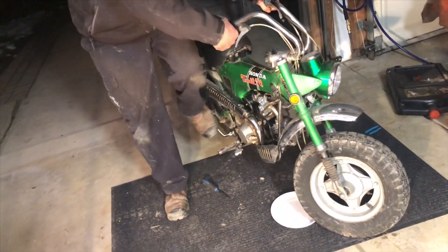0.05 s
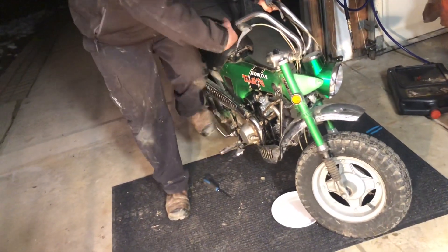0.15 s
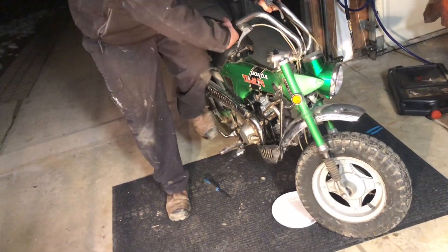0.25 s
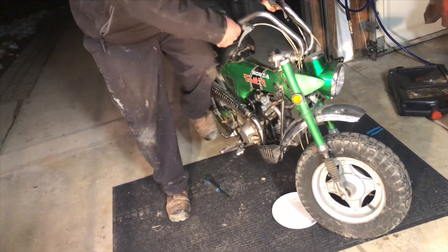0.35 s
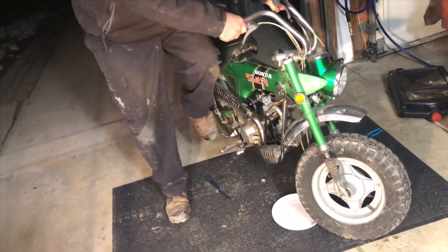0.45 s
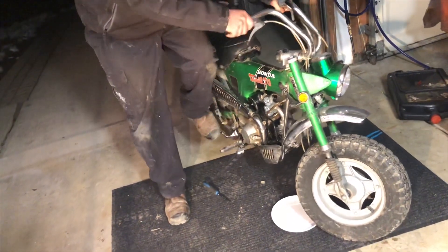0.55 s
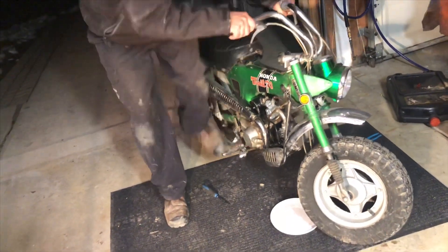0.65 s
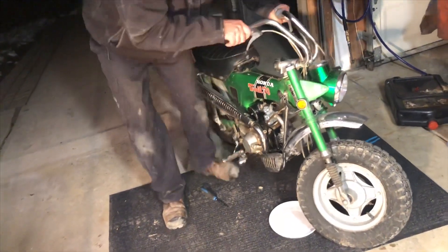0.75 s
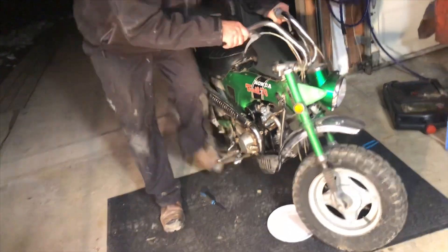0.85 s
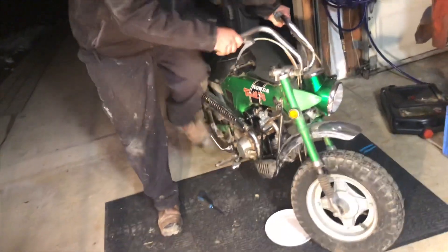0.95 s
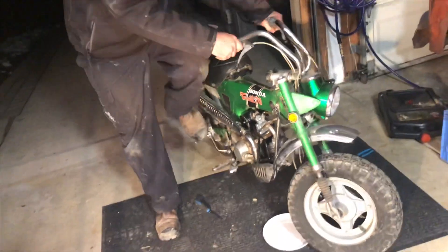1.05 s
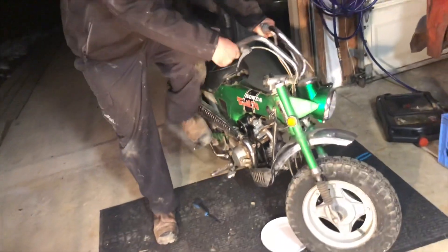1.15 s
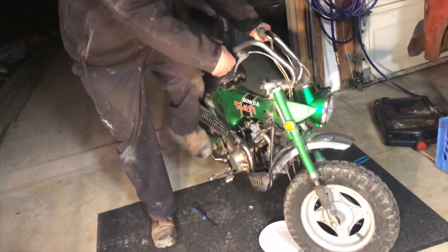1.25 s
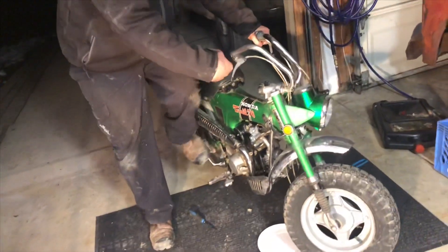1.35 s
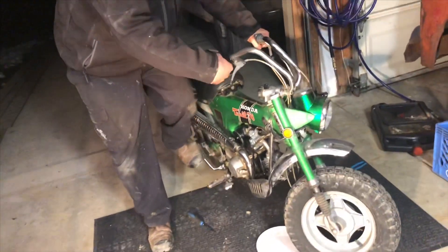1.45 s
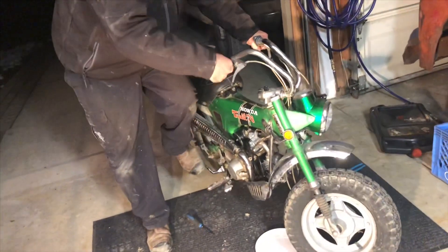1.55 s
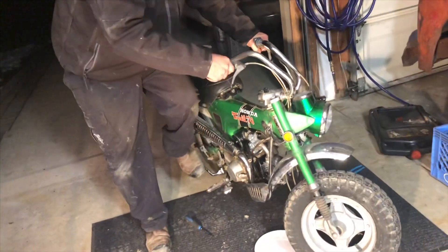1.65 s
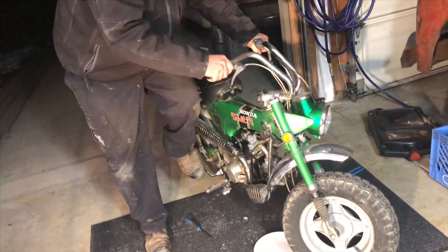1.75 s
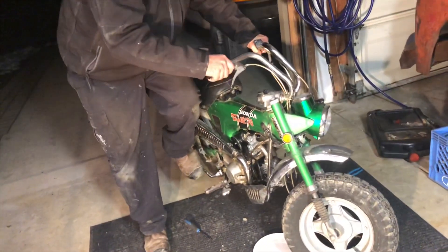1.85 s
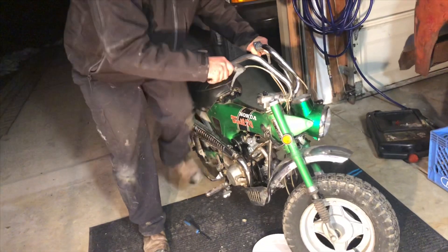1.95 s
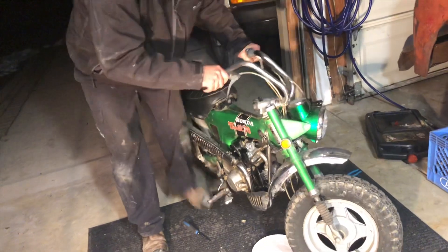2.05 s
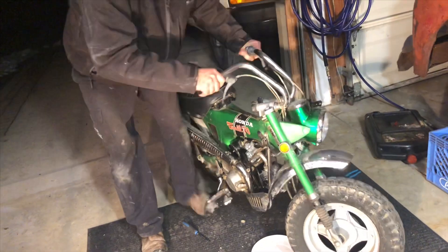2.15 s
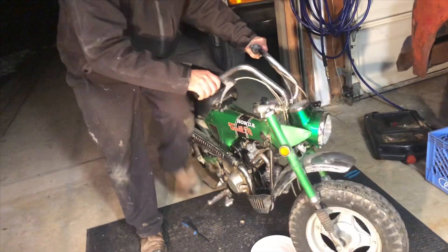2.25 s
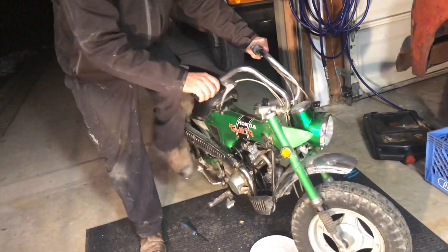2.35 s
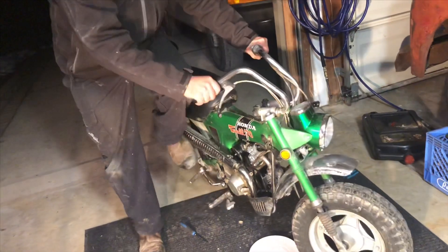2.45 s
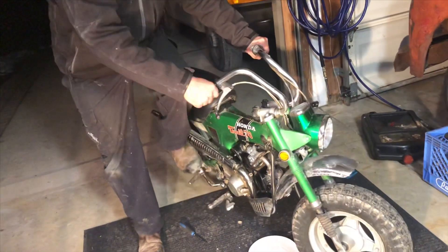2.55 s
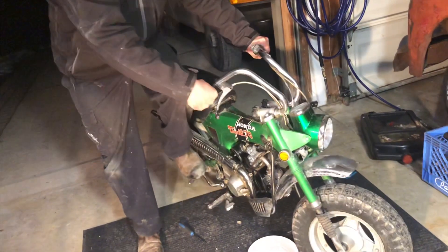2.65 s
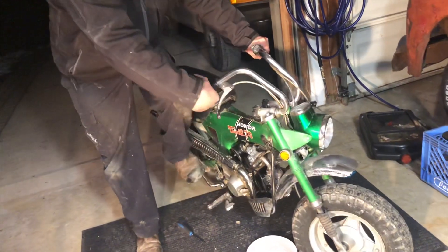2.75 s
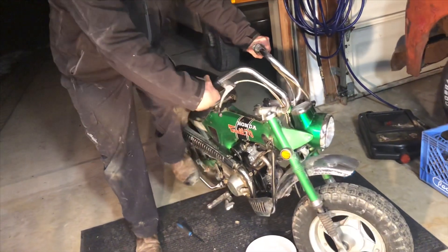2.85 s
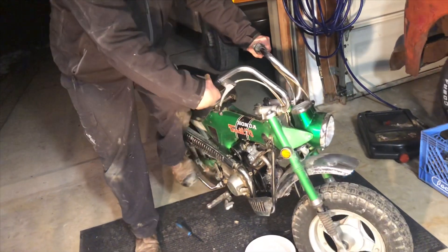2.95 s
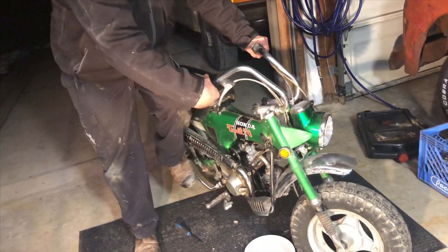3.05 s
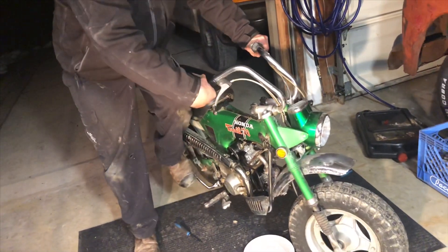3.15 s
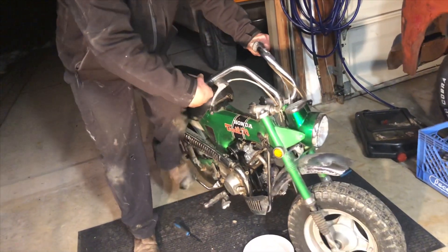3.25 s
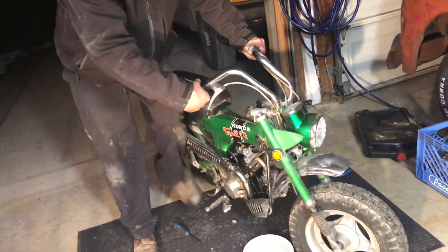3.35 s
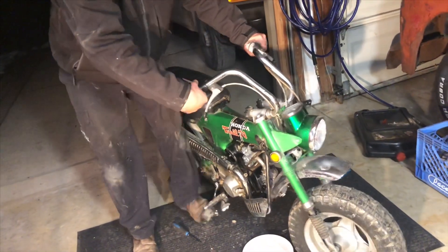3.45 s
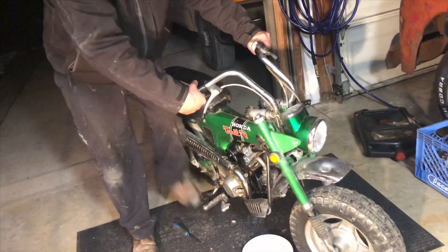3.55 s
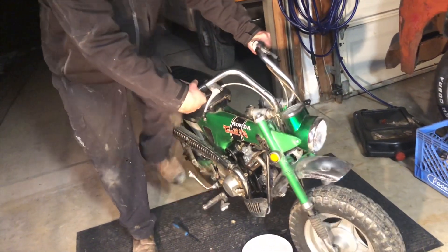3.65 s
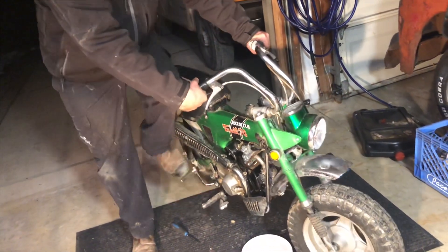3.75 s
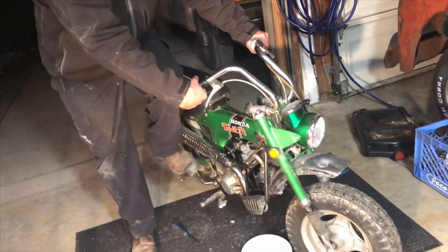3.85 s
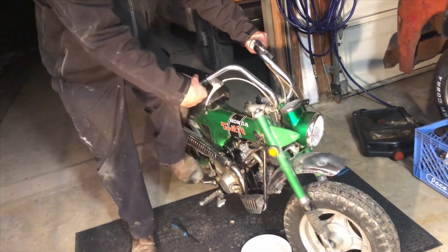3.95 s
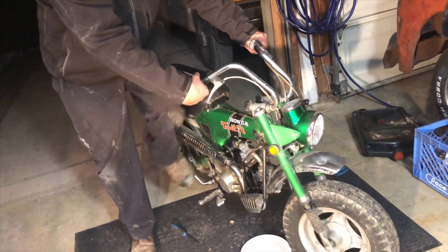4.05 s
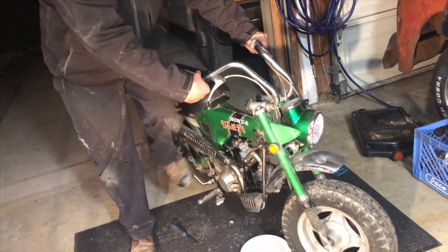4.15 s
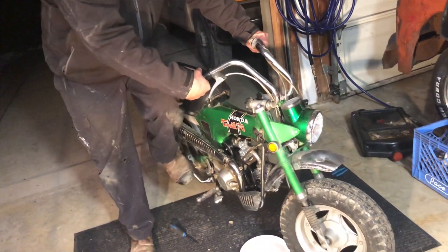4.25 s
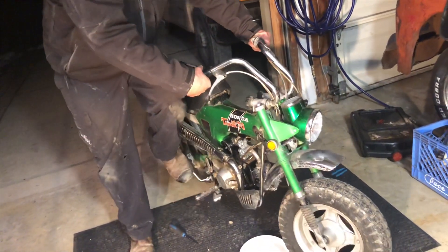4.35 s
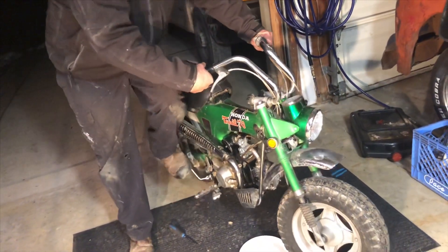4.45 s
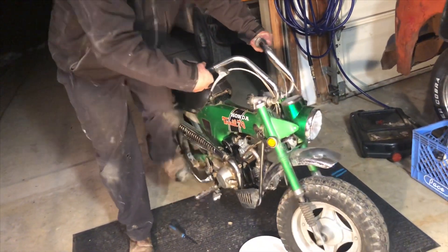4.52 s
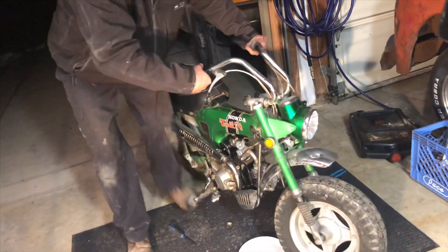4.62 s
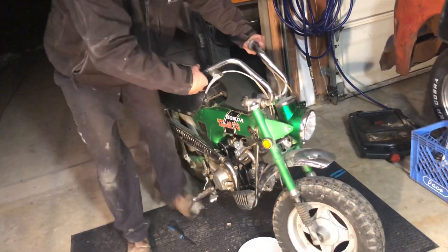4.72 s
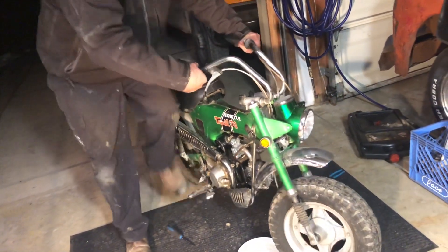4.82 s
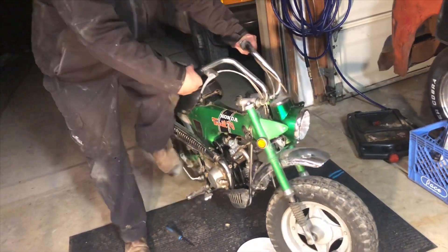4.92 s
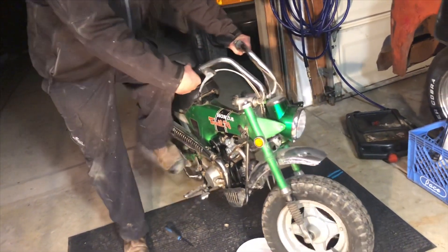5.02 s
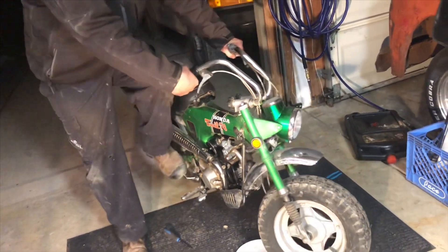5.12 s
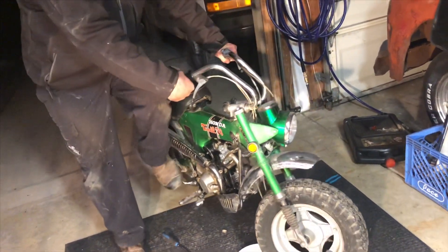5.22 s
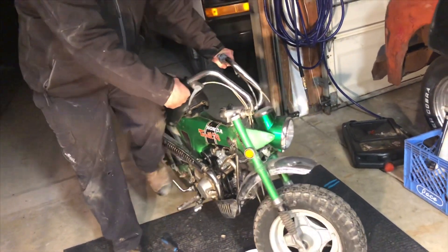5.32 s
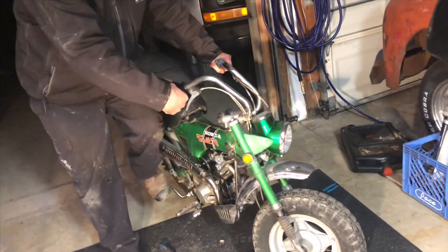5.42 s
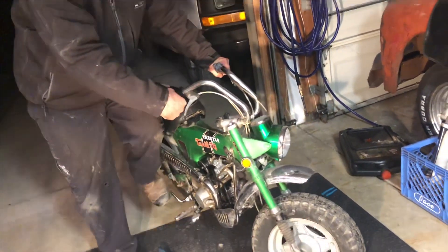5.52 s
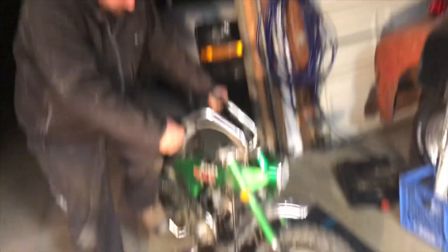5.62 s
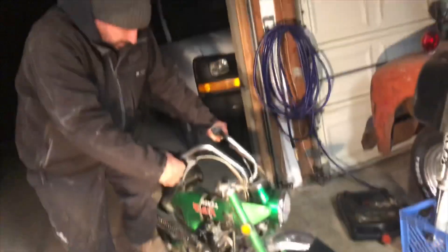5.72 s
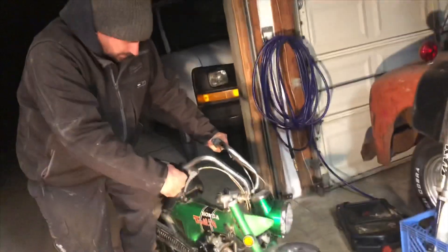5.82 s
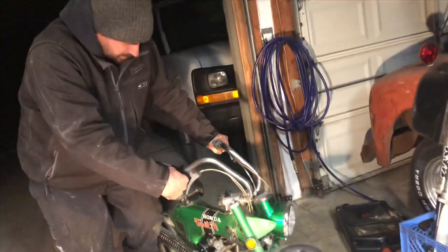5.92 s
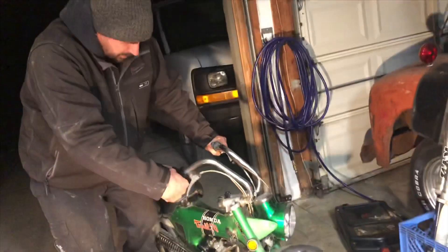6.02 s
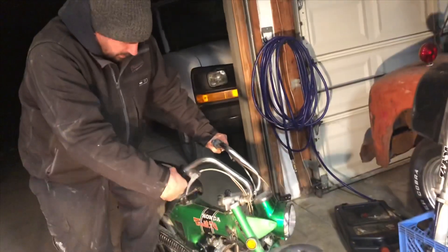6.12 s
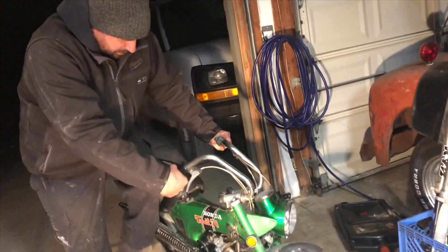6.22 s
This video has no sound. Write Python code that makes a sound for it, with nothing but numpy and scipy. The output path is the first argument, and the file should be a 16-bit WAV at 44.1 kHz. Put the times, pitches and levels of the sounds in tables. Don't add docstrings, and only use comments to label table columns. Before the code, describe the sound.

In a hard-walled garage, a small motorcycle is kicked over four times about every 1.3 seconds. Each kick is a quick burst of metallic clanks, whirring gears, valve clacks and low airy chuffs, then stops with a ringing frame. Between kicks the lever ratchets softly and boots scuff. The engine never fires. Small microphone a couple of steps away, with dense short echo.

```python
import sys
import numpy as np
from scipy import signal
from scipy.fft import rfft, irfft
from scipy.io import wavfile

SR = 44100
rng = np.random.default_rng(int(sys.argv[2]) if len(sys.argv) > 2 else 0)


def output_pcm(signal):
    pcm = np.clip(np.atleast_2d(signal).T, -1, 1) * 32767
    wavfile.write(sys.argv[1], SR, np.round(pcm).astype(np.int16))


def gain_from_db(level_db):
    decades = np.asarray(level_db, float) / 20
    return 10 ** decades


N = 276948

# pitch_hz, density_db
ROOM_SPECTRUM = [(12, -53), (20, -2), (53, -3), (141, -1.5), (961, -9), (1200, -19), (1310, -6.5),
                 (1500, -7.5), (1630, -13.5), (8920, -32), (15600, -40.5)]
ROOM_DB = -61
# pitch_hz, level_db
MAINS_HUM = [(59, -73), (120, -74.5)]
# pitch_hz, t60_s
ECHO_T60 = [(60, 0.46), (250, 0.56), (1200, 0.43), (4000, 0.41), (12000, 0.25)]

# pitch_hz, density_db
WHIRR_SPECTRUM = [(150, -30), (250, 8), (576, -1), (707, -2.5), (1480, 0.5), (1690, -3), (3090, -14),
                  (3750, -21.5), (4500, -39), (5850, -72), (9900, -120)]
# pitch_hz, density_db
BREATH_SPECTRUM = [(18, -66), (30, -32), (88, -2), (150, -8.5), (200, 2), (230, -7), (409, -7.5),
                   (500, -23), (650, -31), (1100, -120)]
# pitch_hz, density_db
RATTLE_SPECTRUM = [(1470, -6), (2500, -69), (3070, 9.5), (3780, 8.5), (4790, -0.5), (7190, -8.5),
                   (8130, -6), (11000, -14), (15600, -27)]
CASE_HZ = [700, 1050, 1200, 1600, 1860, 2150, 2550, 2900, 3670, 4500, 5500, 6400]
# width_hz, level_db
CASE_MODES = [(90, 7), (80, 7), (90, 5), (120, 2), (90, 6), (100, 3), (110, 4), (150, 3), (380, -1.5),
              (400, 2), (350, 4), (250, 4)]

TUBE_HZ = [388, 592, 1044, 1141, 1190, 1211, 1437]
# level_db, t60_s
TUBE_MODES = [(-4, .7), (-8, .8), (-3, 1.7), (5, 1.3), (5, 1.8), (2, 2.0), (-8, 1.0)]
# time_s, level_db
GRIP = [(0, 8), (.7, -19), (1.1, -5), (1.3, 11), (2.1, 6.5), (2.6, -9), (3.298, 20), (3.5, -4), (3.85, -16),
        (4.6, 7), (4.901, 0), (5.2, -1), (6.28, 6)]
# start_s, level_db, pitch_hz, t60_s
SINGING_TUBES = [
    (.97, -54, 1044, 2.6),
    (2.5, -54, 1211, 2.6),
    (1.15, -56, 1200, 2.8),
    (3.6, -52, 1044, 3.2),
    (3.85, -54, 1190, 1.2),
]
SING_RISE_S = 0.024

SQUEAK_HZ = [1150, 12200, 1100, 10400, 7080, 5260, 1080, 6450, 1050, 1060, 2800, 1075, 7100, 1150, 5500,
             2500, 1140, 975, 1095]
# start_s, length_s, level_db
SQUEAKS = [(.01, 0.07, -52), (0.302, 0.12, -82), (0.794, 0.053, -30), (0.75, .032, -59), (1.004, 0.03, -40),
           (1.229, 0.02, -52), (2.1, 0.17, -39), (2.2, 0.016, -42), (3.385, 0.08, -35),
           (3.489, 0.071, -32.5), (4.637, 0.035, -41), (4.915, 0.06, -34.5), (5.912, 0.027, -84),
           (6.11, 0.12, -55.5), (3.385, 0.039, -56), (5.916, .03, -57), (4.728, 0.06, -34.5),
           (4.645, .04, -45), (5.1, 0.16, -52)]

# peak_s, level_db, pitch_hz
BOOTS = [(0.016, -44.5, 151), (0.0867, -42.5, 157), (0.1997, -35.5, 210), (0.2533, -41.5, 160),
         (1.4203, -42.5, 177), (1.535, -40, 181), (1.579, -46.5, 150), (2.8157, -39.5, 157),
         (2.965, -44.5, 178), (3.0286, -47.5, 127), (4.1555, -36, 173), (5.297, -46, 157),
         (5.443, -41.5, 153), (5.4843, -48, 117), (5.6608, -41.5, 162), (5.689, -49, 150),
         (5.7762, -41, 162), (5.995, -32, 157), (6.0383, -41, 131), (6.2582, -50, 163.5)]
BOOT_HALF_S = 0.0047
# peak_s, level_db, pitch_hz
THUMPS = [(0.0966, -44.5, 357), (0.205, -39, 353), (0.7298, -33, 325), (0.7591, -33, 353),
          (0.968, -43, 406), (.253, -47, 403), (.787, -34, 390), (1.08, -45, 345), (1.472, -48.5, 357),
          (4.836, -44, 386), (1.2, -39, 440), (1.426, -49.5, 310), (2.188, -28.5, 480), (2.299, -26.5, 433),
          (2.4444, -46, 442), (2.5258, -36.5, 480), (2.986, -39.5, 393), (3.594, -35, 310),
          (3.646, -37, 386), (3.8684, -33.5, 440), (4.149, -47, 376), (4.726, -33, 381), (4.7477, -37, 390),
          (5.1318, -46, 366), (6.0187, -36.5, 399)]
THUMP_HALF_S, THUMP_HARDENING = 0.0061, 0.44
# peak_s, level_db, pitch_hz, half_length_s
STROKES = [(.7347, -24.5, 173, 0.0065), (.843, -22.5, 159, 0.012), (.9051, -25.5, 152, 0.0039),
           (.941, -27.5, 141.6, 0.0061), (.975, -25, 160, 0.0087), (1.1346, -32, 115, 0.0097),
           (1.1975, -38, 166, 0.023), (2.1707, -20, 153.7, 0.0053), (2.188, -26, 158, .007),
           (2.2382, -28, 147, 0.0019), (2.305, -31, 173, 0.0054), (2.374, -42, 130, 0.0072),
           (2.2739, -24.5, 155, 0.0095), (2.335, -31.5, 127, 0.006), (2.462, -30.5, 120.5, 0.011),
           (2.5117, -29, 195.4, 0.0066), (2.54, -31.5, 101, 0.0041), (3.4655, -24.5, 149, 0.0037),
           (3.4763, -21, 142, 0.0091), (3.5369, -29, 134, 0.0031), (3.5854, -19.5, 139, 0.0058),
           (3.6475, -26.5, 130, 0.0042), (3.728, -30, 125, .006), (3.85, -37, 168, 0.01),
           (3.7452, -25.5, 125, 0.0052), (3.7714, -29.5, 168, 0.0054), (3.8947, -42.5, 192, 0.017),
           (4.6905, -26.5, 148, 0.0022), (4.6975, -21, 140, 0.0049), (4.711, -26.5, 151, 0.0052),
           (4.7235, -26, 150, 0.0043), (4.818, -33, 138, 0.0044), (4.856, -29, 120, 0.0076),
           (4.7875, -18.5, 140, 0.0077), (4.8005, -23, 150, 0.0033), (4.8834, -18.5, 144, 0.0074),
           (4.8955, -20, 148.5, 0.0038), (4.9518, -30, 160, 0.006), (5.0137, -25.5, 119, 0.008),
           (5.05, -29, 162, 0.0039), (4.77, -36, 151, 0.0061), (5.09, -38, 128, 0.012),
           (5.166, -44, 172, 0.0073), (5.1143, -49, 197, 0.0026)]
# peak_s, level_db, pitch_hz, rebound_after_s
HAMMER = [
    (.8505, -13.3, 809, .005),
    (.967, -15.9, 840, .005),
    (2.1833, -13.5, 828, .0051),
    (2.3002, -16.8, 758, .0039),
]
HAMMER_HALF_S, HAMMER_DB = 0.00094, -2.5
REBOUND_PITCH, REBOUND_DB = 0.885, 0.4

# start_s, level_db, pitch_hz, dying_s
RINGS = [(.7168, -34, 2820, .006), (.79, -40, 5500, .01), (.8495, -21.5, 2080, .008),
         (.9288, -34, 2460, .008), (.9657, -21.5, 1820, 0.0077), (1.1493, -27.5, 3280, 0.0044),
         (1.152, -25.5, 2430, 0.0075), (2.0818, -39, 5660, 0.0057), (2.1361, -32.5, 1940, .01),
         (2.181, -26, 1820, 0.013), (2.21, -29.5, 2270, 0.047), (2.2983, -19.5, 1900, 0.006),
         (2.33, -34, 1910, 0.019), (2.5193, -28.5, 1720, .008), (2.951, -41.5, 3800, 0.012),
         (3.374, -34, 1130, 0.02), (3.4576, -31, 1640, 0.011), (3.487, -30.5, 2500, 0.018),
         (3.5668, -30, 2060, 0.0075), (3.5998, -27, 2540, .01), (3.6392, -35.5, 2540, 0.0066),
         (3.716, -33.5, 2070, 0.0068), (3.7754, -38.5, 2480, 0.012), (3.8367, -37, 8560, .005),
         (4.644, -46, 2820, 0.023), (4.6796, -29, 1540, 0.011), (4.7684, -27, 1610, 0.0048),
         (4.77, -33, 2190, .005), (4.8632, -30, 1630, 0.0055), (4.896, -31.5, 2500, 0.012),
         (4.9944, -40, 2100, 0.0037), (5.0418, -47, 2510, 0.01), (5.408, -58, 1780, 0.013),
         (5.98, -36.5, 3300, 0.0061)]
# start_s, level_db
FINS = [(.8495, -44), (.94, -30), (1.116, -40), (2.0818, -40), (2.183, -34), (2.261, -33), (2.442, -41.5),
        (2.4945, -35.5), (3.459, -50), (3.488, -28.5), (3.6, -35), (3.717, -38.5), (3.775, -37),
        (4.709, -30), (4.772, -35), (4.793, -29.5), (4.865, -33), (5.045, -36)]
FIN_HZ, FIN_S = 3750, 0.021
# start_s, level_db
CHAIN = [
    (.876, -43),
    (2.21, -41),
    (3.517, -40.5),
    (3.64, -43.5),
    (4.732, -37),
    (4.818, -37),
    (4.927, -41),
    (5.107, -44.5),
]
CHAIN_HZ, CHAIN_S = 6260, 0.013
CHAIN_LOW_HZ, CHAIN_LOW_DB = 5130, -1.5
# start_s, level_db, pitch_hz, dying_s
JARS = [(.077, -46, 1400, .004), (.12, -53, 3000, .012), (.178, -43, 2900, 0.0054),
        (0.796, -36, 1070, 0.022), (1.406, -49, 2980, .002), (1.406, -53, 4600, .002),
        (1.506, -47.5, 3460, 0.0088), (1.637, -49.5, 4260, 0.014), (2.788, -54, 4460, 0.0055),
        (2.885, -51, 2970, 0.0087), (2.952, -41, 2740, .006), (3.379, -43, 2577, 0.047),
        (3.378, -48, 3800, .04), (3.392, -46, 5360, 0.048), (4.65, -47, 5400, 0.037),
        (4.645, -53, 3700, .03), (5.033, -43, 6500, 0.0062), (5.287, -50, 2180, .003),
        (5.344, -57, 4430, 0.0084), (5.385, -49, 700, 0.0079), (5.42, -46.5, 576, 0.024),
        (5.652, -52, 2010, 0.0021), (5.767, -56, 2210, 0.0074), (5.93, -46, 1306, 0.025),
        (6.0, -43, 580, .02), (3.457, -53, 9000, .006), (3.593, -44, 8000, .006), (3.716, -54, 11000, .01),
        (4.715, -32, 790, 0.018), (4.785, -26, 853, 0.027), (4.895, -35, 803, 0.024),
        (5.92, -51, 2480, .02), (5.93, -62, 3880, .02), (5.335, -49, 2300, 0.027),
        (5.979, -48, 4430, 0.012), (6.04, -57, 4140, 0.037), (.19, -49, 542, 0.021),
        (2.965, -43, 660, 0.014), (4.16, -41, 320, 0.045), (1.64, -50, 840, 0.016),
        (.737, -35, 940, .012), (.795, -24, 950, .02), (.755, -33, 1570, .02), (.903, -28, 1190, .01),
          (0.906, -36, 2580, .02), (.921, -38, 3880, .008), (0.927, -34, 3130, .008),
          (0.971, -29, 1280, .01), (1.03, -31, 1130, 0.053), (1.157, -31.5, 1280, 0.014),
          (2.299, -21.5, 683, 0.0072), (2.443, -36, 2330, 0.0089), (3.518, -37, 2500, .008),
          (3.583, -32, 1720, .012), (4.735, -38, 2580, .01), (4.862, -31, 2070, .008),
          (4.68, -31, 2100, .012), (4.896, -40, 3800, .012), (5.652, -52, 2600, 0.0025),
          (5.652, -50, 1600, .003), (3.845, -48, 5200, 0.024)]
RING_Q = 8.6

# boot_lands_s, lever_bottoms_s, crank_halts_s, push_db, coast_db
KICKS = [
    (0.716, 0.849, 1.107, 3, 1.6),
    (2.068, 2.201, 2.41, 1, -0.2),
    (3.351, 3.457, 3.714, -7, -2),
    (4.616, 4.692, 4.914, 0.5, 0),
]
RISE_S, FREE_S, CATCH_S, SETTLE_S, STILL_S = 0.053, 0.053, 0.069, 0.18, 0.65
LANDING_S = 0.023
WHIRR_STAGES = [
    -53.5,
    -38.5,
    -34.5,
    -52,
    -37,
    -47.5,
    -52,
    -70.5,
]
BREATH_STAGES = [-74, -47, -42, -34.5, -44.5, -43.5, -55.5, -65]
RATTLE_STAGES = [-68.5, -45, -50, -48, -47, -60.5, -64, -86.5]
RATTLE_FOLLOWS = 0.49
# time_s, level_db
ROCKING = [
    (0, -53),
    (.4, -61),
    (.7, -68),
    (.71, -99),
    (5.9, -99),
    (5.97, -55),
    (6.28, -61.5),
]
ROCK_BREATH_DB, ROCK_RATTLE_DB = -5, -17

# start_s, level_db, knock_hz, top_db (over tick)
BLOWS = [(0.8429, -32.5, 1000, -6), (.8485, -20.5, 720, -23), (0.965, -22.5, 640, -19),
         (1.1967, -29, 650, -27), (2.066, -51, 655, 1), (2.1515, -34, 850, -15),
         (2.1798, -20.5, 780, -14.5), (2.2983, -22, 694, -19), (2.518, -30.5, 656, -40),
         (2.5503, -37.5, 530, -27), (3.486, -24, 870, -12.5), (3.5993, -28.5, 806, -8.5),
         (4.7066, -27, 824, -6.5), (4.7333, -36, 1210, -23), (4.7669, -25, 860, -4),
         (4.7909, -27, 850, -5.5), (4.893, -28, 850, -6), (5.106, -40.5, 970, -7)]
BLOW_KNOCK_DB, BLOW_S = 1.5, 0.017
# start_s, level_db, knock_hz, knock_db (over tick), top_db (over tick)
VALVES = [(0.718, -28, 1470, -4.5, -17), (0.7955, -32, 1140, -1, -5.5), (1.1488, -24, 2390, -4, -12.5),
          (3.457, -29.5, 1690, 5, -23), (3.5662, -32, 1590, 5, -12), (3.716, -31, 2000, -0.5, -52),
          (4.678, -35, 1680, 8, -3), (4.8619, -25, 1450, 0.5, -9), (4.994, -28, 2070, 0, -17.5),
          (5.04, -32, 2440, 2, -11)]
VALVE_S, VALVE_RISE_S = 0.023, 0.00073
# start_s, level_db, top_db (over tick)
TICKS = [(0.877, -33, -14), (1.006, -49, 5.5), (1.1145, -34, -17), (2.08, -36, -4), (2.173, -36, -4),
         (2.2096, -25, -15), (2.3344, -43, -0.5), (2.442, -32.5, -19), (2.807, -44, -13), (3.5182, -39, -9),
         (3.6357, -42, -2), (3.7633, -33.5, -10), (4.9279, -33.5, -10), (6.247, -37.5, -25)]
TICK_HZ, TICK_KNOCK_DB, TICK_S = 1006, -5.5, 0.024
# start_s, level_db, knock_hz, top_db (over tick)
SCRAPES = [
    (0.9242, -25.5, 1030, -13.5),
    (2.884, -42, 2440, -36),
    (3.377, -37.5, 980, -33),
    (4.644, -42, 1010, -26),
    (5.915, -46.5, 2340, -30),
]
SCRAPE_KNOCK_DB, SCRAPE_S, SCRAPE_RISE_S = -10.5, 0.029, 0.013
# start_s, level_db, knock_hz, knock_db (over tick), top_db (over tick)
LEVER = [(0.0747, -61, 1200, 13, -31), (0.12, -46.5, 1150, -10, -31), (0.176, -42, 1600, 5.5, -41),
         (0.4205, -46.5, 1100, -3, -10.5), (1.4046, -56, 1090, 15, -28), (1.4608, -43, 1230, -6, -38),
         (1.511, -45.5, 1520, 6.5, -31), (1.6374, -49, 810, 4.5, -9), (2.492, -25, 1470, -3, -12.5),
         (3.835, -26.5, 1230, -1.5, -23), (2.9505, -39, 1440, 1.5, -49), (4.141, -34, 1450, 3, -21),
         (4.382, -49.5, 1680, 5.5, -30), (5.284, -51.5, 895, 7, -56), (5.347, -42.5, 1350, -1, -47),
         (5.407, -46, 1750, 7.5, -31), (5.764, -65, 1190, -9, -24), (5.976, -33.5, 1660, 2, -26)]
LEVER_S, LEVER_RISE_S = 0.027, 0.0027
# start_s, level_db
SNAPS = [
    (5.651, -46),
]
SNAP_HZ, SNAP_KNOCK_DB, SNAP_TOP_DB, SNAP_S = 1370, -1, -34, 0.0015
HIT_RISE_S = 0.00073


def rms_one(x):
    return x / np.sqrt(np.mean(x ** 2) + 1e-20)


def peak_one(x):
    return x / np.abs(x).max()


def at_hz(points, hz):
    points = np.array(points)
    return np.interp(np.log(hz), np.log(points[:, 0]), points[:, 1])


def add(out, s, sound):
    i = round(s * SR)
    out[i:i + len(sound)] += sound[:N - i]


def band(x, low_hz, high_hz):
    return signal.sosfilt(signal.butter(2, [low_hz, high_hz], "band", fs=SR, output="sos"), x)


def resonance(x, hz, width_hz):
    r = np.exp(-np.pi * width_hz / SR)
    zeros = np.array([1, 0, -1]) * (1 - r * r) / 2
    poles = [1, -2 * r * np.cos(2 * np.pi * hz / SR), r * r]
    return signal.lfilter(zeros, poles, x)


def coloured(x, spectrum):
    hz = np.maximum(np.arange(N // 2 + 1) * SR / N, 1)
    return rms_one(irfft(rfft(x) * gain_from_db(at_hz(spectrum, hz)), N))


def flutter(rate_hz, depth_db):
    r = np.exp(-2 * np.pi * rate_hz / SR)
    slow = signal.lfilter([1], [1, -2 * r, r * r], rng.standard_normal(N))
    return gain_from_db(depth_db * rms_one(slow))


def background():
    t = np.arange(N) / SR
    hum = sum(gain_from_db(db + 6.5) * np.sin(2 * np.pi * hz * t) for hz, db in MAINS_HUM)
    air = coloured(rng.standard_normal(N), ROOM_SPECTRUM)
    return gain_from_db(ROOM_DB) * air * flutter(22, 0.56) + hum * flutter(6, 4.7)


def garage_echo():
    t = np.arange(SR * 3 // 2) / SR
    tail = np.zeros(len(t))
    for low in 40 * 2 ** np.arange(0, 9.):
        octave = band(rng.standard_normal(len(t)), low, min(2 * low, 19000))
        tail += octave * gain_from_db(-60 * t / at_hz(ECHO_T60, low * np.sqrt(2)))
    return tail * (1 - np.exp(-t / 0.02)) ** 2 / np.sqrt(SR)


def singing():
    out, t = np.zeros(N), np.arange(2 * SR) / SR
    wander = 0.7 * np.log(flutter(12, 8.7))
    for s, db, hz, t60 in SINGING_TUBES:
        drift = wander[round(s * SR) // 2:][:len(t)]
        tone = np.sin(2 * np.pi * hz * t + drift)
        add(out, s, gain_from_db(db - 60 * t / t60) * (1 - np.exp(-t / SING_RISE_S)) * tone)
    return out * flutter(8, 4)


def frame(shake):
    shake = shake * gain_from_db(np.interp(np.arange(N) / SR, *np.transpose(GRIP)))
    out = np.zeros(N)
    for hz, (db, t60) in zip(TUBE_HZ, TUBE_MODES):
        out += gain_from_db(db) * resonance(shake, hz, np.log(1000) / np.pi / t60)
    return out


def squeaks():
    out, t = np.zeros(N), np.arange(SR // 4) / SR
    for hz, (s, length, db) in zip(SQUEAK_HZ, SQUEAKS):
        narrow = resonance(rng.standard_normal(len(t)), hz, min(hz / 26, 135))
        waver = rms_one(resonance(narrow, hz, 250))
        waver = rms_one(waver + np.sqrt(2) * np.sin(2 * np.pi * hz * t))
        octave = resonance(waver ** 2, min(2 * hz, SR / 2.5), 400) * np.exp(-t / 0.033)
        swell = (1 - np.exp(-t / 0.0089)) * np.exp(-(t / length) ** 1.3)
        add(out, s, gain_from_db(db) * (waver + 0.19 * octave) * swell)
    return out


def rings():
    out, t = np.zeros(N), np.arange(SR // 8) / SR
    fins = [(s, db, FIN_HZ, FIN_S) for s, db in FINS]
    chain = [(s, db, CHAIN_HZ, CHAIN_S) for s, db in CHAIN]
    guide = [(s, db + CHAIN_LOW_DB, CHAIN_LOW_HZ, CHAIN_S) for s, db in CHAIN]
    for s, db, hz, dying in RINGS + fins + chain + JARS + guide:
        hits = rng.standard_normal(len(t)) * np.exp(-t / np.clip(dying, 0.002, 0.05))
        hits[0] = 7.1
        ring = resonance(resonance(hits, hz, hz / RING_Q), hz, 3 * hz / RING_Q)
        add(out, s, gain_from_db(db) * peak_one(ring))
    return out


def pushes(table, sag, overtone, sharpness, shove):
    out, t = np.zeros(N), np.arange(SR // 6) / SR
    for s, db, hz, half in table:
        rise = 1.44 * np.clip(half, 0.0005, 0.03)
        phase = 2 * np.pi * hz * (t - rise) * (1 - sag * t / rise)
        wave = np.cos(phase) + overtone * np.cos(2 * phase + 0.63) + shove * np.cos(phase / 2 + 1.5)
        swell = (t / rise * np.exp(1 - t / rise)) ** sharpness
        add(out, max(s - rise, 0), gain_from_db(db) * wave * swell)
    return out


def tank_thumps():
    thumps = [(s, db, hz, THUMP_HALF_S * gain_from_db(-THUMP_HARDENING * (db + 41))) for s, db, hz in THUMPS]
    return pushes(thumps, sag=0.026, overtone=0.078, sharpness=1.47, shove=0.048)


def chuffs_and_boots():
    boots = [(s, db, hz, BOOT_HALF_S) for s, db, hz in BOOTS]
    return pushes(STROKES + boots, sag=0.017, overtone=0.18, sharpness=1.5, shove=0.076)


def lever_stop():
    hits = []
    for s, db, hz, gap in HAMMER:
        hits.append((s, db, hz, HAMMER_HALF_S))
        hits.append((s + gap, db + REBOUND_DB, hz * REBOUND_PITCH, HAMMER_HALF_S))
    return gain_from_db(HAMMER_DB) * pushes(hits, sag=0.0026, overtone=0.085, sharpness=1.4, shove=0.014)


def through_case(x, strengths):
    out = x
    for strength, hz, (width_hz, db) in zip(strengths, CASE_HZ, CASE_MODES):
        out = out + strength * gain_from_db(db) * resonance(x, hz, width_hz)
    return out


def grains(per_s, spread_db):
    sizes = gain_from_db(spread_db * np.minimum(rng.exponential(1, N), 5)) * rng.choice([-1, 1], N)
    return sizes * (rng.random(N) < per_s / SR)


def motion(stage_db, rock_db, follows=1):
    t = np.arange(N) / SR
    out = gain_from_db(np.interp(t, *np.transpose(ROCKING)) + rock_db)
    for land, bottom, halt, push_db, coast_db in KICKS:
        s = [land, land + RISE_S, bottom, bottom + FREE_S, bottom + CATCH_S,
             halt, halt + SETTLE_S, halt + STILL_S]
        db = list(np.add(stage_db, np.repeat([follows * push_db, coast_db], [3, 5])))
        s.append(s[-1] + SETTLE_S)
        db.append(db[-1] - 16.5)
        onset = np.clip((t - land) / LANDING_S + 1, 0, 1) ** 2
        out = out + gain_from_db(np.interp(t, s, db)) * onset
    return out


def moving_parts():
    spots = [flutter(22, 3.5) for _ in CASE_HZ]
    whirr = coloured(through_case(grains(2500, 0.66), spots), WHIRR_SPECTRUM) * flutter(31, 0.89)
    breath = coloured(rng.standard_normal(N), BREATH_SPECTRUM) * flutter(25, 3.7)
    rattle = coloured(through_case(grains(6600, 1.1), spots), RATTLE_SPECTRUM) * flutter(17.5, 3.2)
    out = motion(WHIRR_STAGES, 0) * whirr
    out = out + motion(BREATH_STAGES, ROCK_BREATH_DB) * breath
    return out + motion(RATTLE_STAGES, ROCK_RATTLE_DB, RATTLE_FOLLOWS) * rattle


def contacts():
    return ([(s, db, hz, BLOW_KNOCK_DB, top, BLOW_S, HIT_RISE_S) for s, db, hz, top in BLOWS]
            + [(s, db, hz, knock, top, VALVE_S, VALVE_RISE_S) for s, db, hz, knock, top in VALVES]
            + [(s, db, TICK_HZ, TICK_KNOCK_DB, top, TICK_S, HIT_RISE_S) for s, db, top in TICKS]
            + [(s, db, hz, SCRAPE_KNOCK_DB, top, SCRAPE_S, SCRAPE_RISE_S) for s, db, hz, top in SCRAPES]
            + [(s, db, hz, knock, top, LEVER_S, LEVER_RISE_S) for s, db, hz, knock, top in LEVER]
            + [(s, db, SNAP_HZ, SNAP_KNOCK_DB, SNAP_TOP_DB, SNAP_S, HIT_RISE_S) for s, db in SNAPS])


def clacks():
    out, t = np.zeros(N), np.arange(SR // 6) / SR
    for s, db, knock_hz, knock_db, top_db, rattle, rise in contacts():
        fine, finer, coarse, dull = rng.standard_normal((4, len(t)))
        spot = gain_from_db(5 * rng.standard_normal(len(CASE_HZ)))
        fade = np.exp(-t / np.clip(rattle, 0.001, 0.05)) * (1 - np.exp(-t / rise))
        crack = 1 + 1.2 * np.exp(-t / 0.003)
        tick = through_case(band(fine * fade * crack, 1014, 2710), spot)
        top = band(finer * fade ** 1.3, 2600, 9160)
        bounces = coarse * (np.abs(coarse) > 2.1) * fade
        knock = resonance(resonance(bounces + 1e-9 * fine, knock_hz, 167), knock_hz, 1100)
        body = band(dull * fade ** 0.7, 240, 1000)
        low = 0.67 * peak_one(knock) + 0.79 * peak_one(body)
        clack = peak_one(tick) + gain_from_db(top_db) * peak_one(top) + gain_from_db(knock_db) * low
        add(out, s, gain_from_db(db) * clack)
    return out


def scene():
    metal = clacks() + moving_parts() + lever_stop()
    bike = metal + chuffs_and_boots() + tank_thumps() + squeaks() + frame(metal) + rings() + singing()
    echo = gain_from_db(11) * signal.fftconvolve(bike, garage_echo())[:N]
    return (bike + echo + background())[None]


def band_limit(x):
    return signal.sosfilt(signal.butter(12, 15730, fs=SR, output="sos"), x)


def record(dry):
    top_cut = signal.sosfilt(signal.cheby2(12, 60, 16450, fs=SR, output="sos"), dry)
    mix = signal.sosfilt(signal.butter(3, 33, "high", fs=SR, output="sos"), top_cut)
    return band_limit(mix)


dry = scene()
out = record(dry)
output_pcm(out)
```